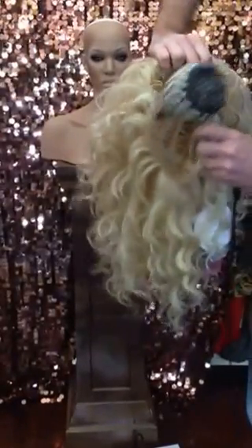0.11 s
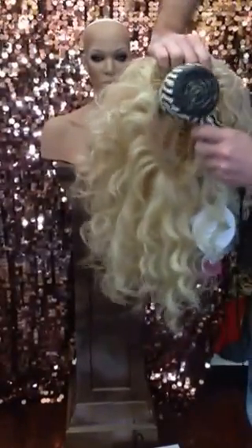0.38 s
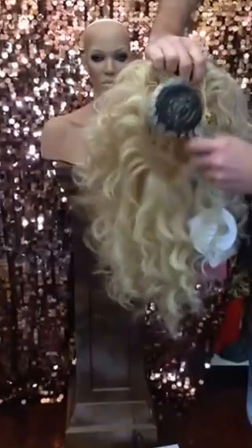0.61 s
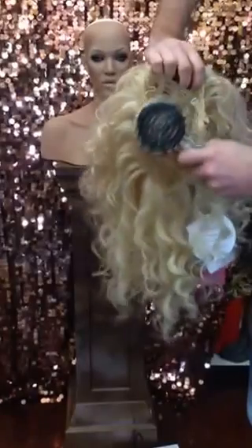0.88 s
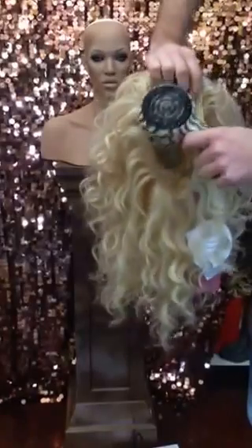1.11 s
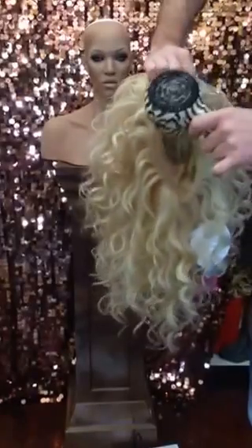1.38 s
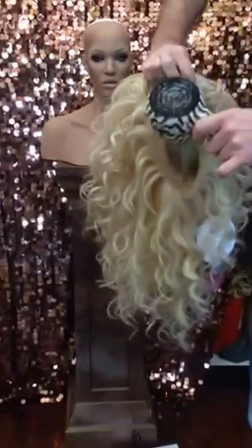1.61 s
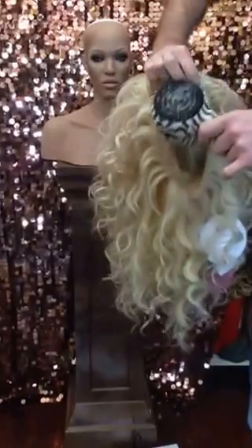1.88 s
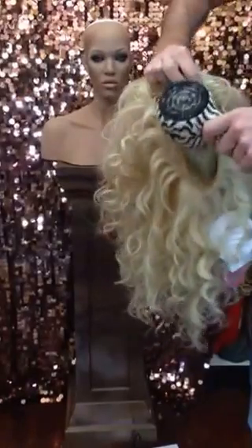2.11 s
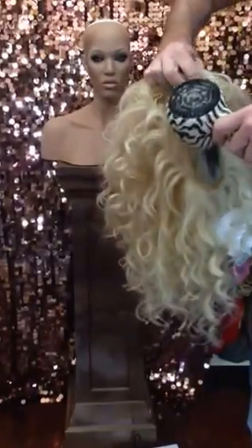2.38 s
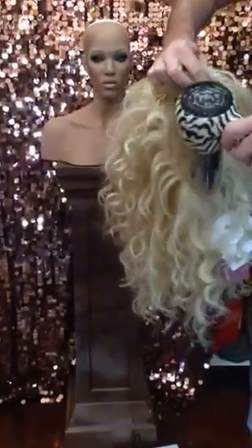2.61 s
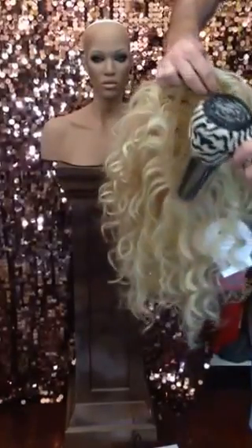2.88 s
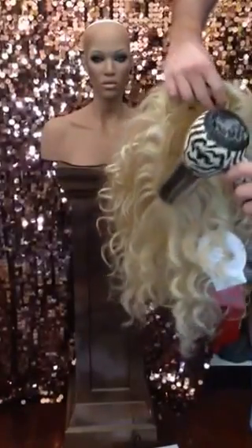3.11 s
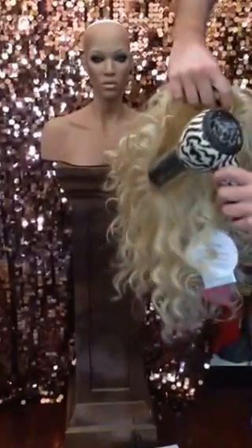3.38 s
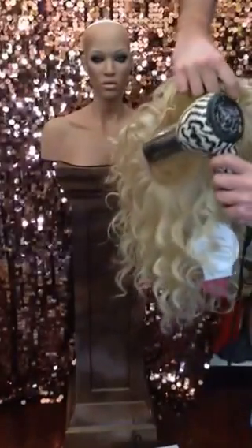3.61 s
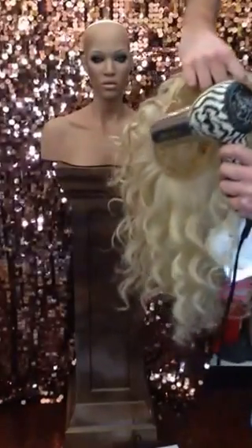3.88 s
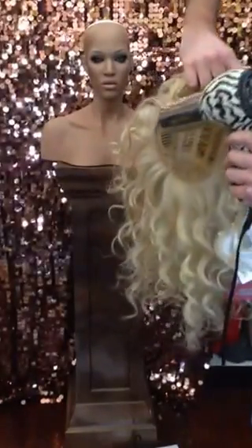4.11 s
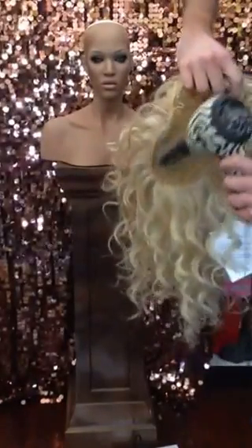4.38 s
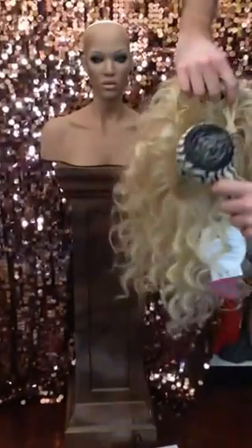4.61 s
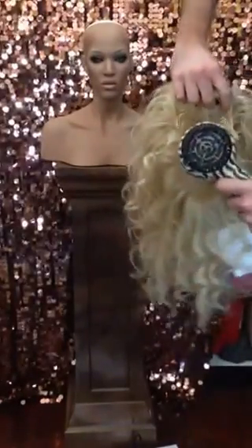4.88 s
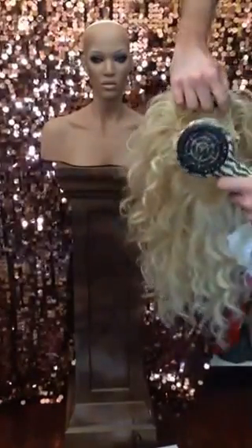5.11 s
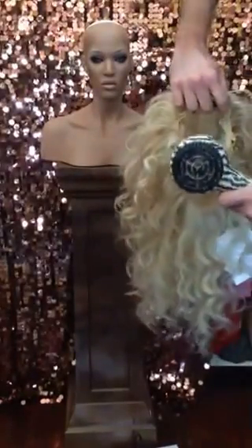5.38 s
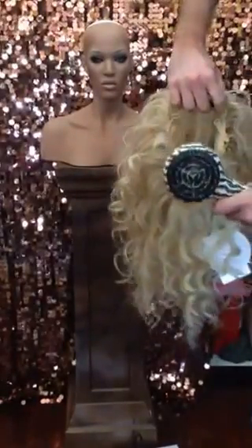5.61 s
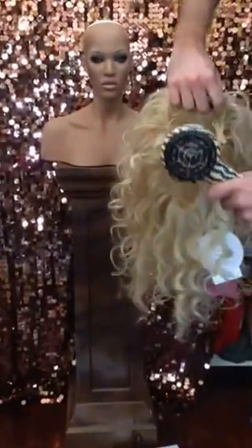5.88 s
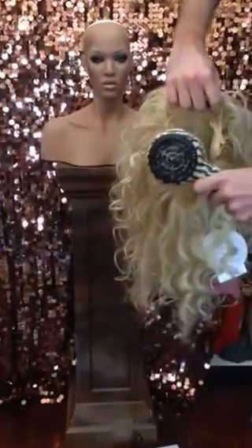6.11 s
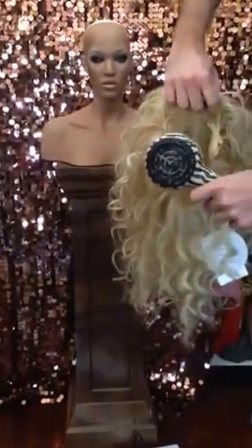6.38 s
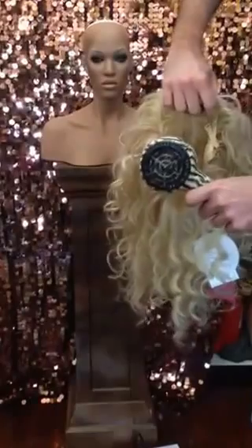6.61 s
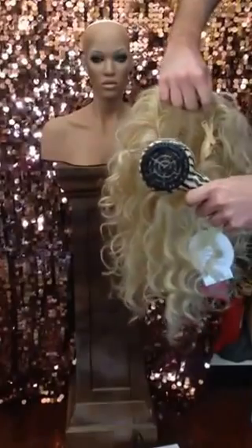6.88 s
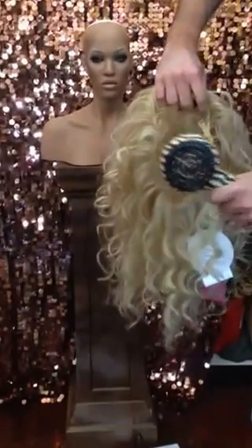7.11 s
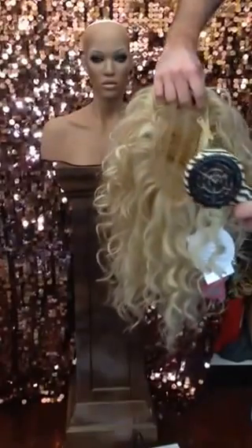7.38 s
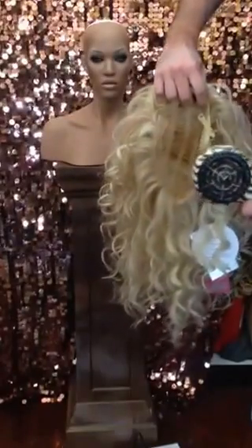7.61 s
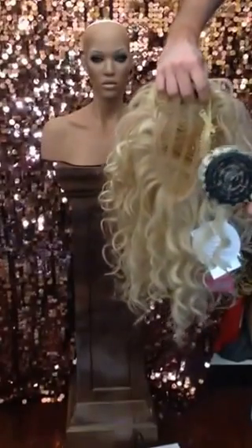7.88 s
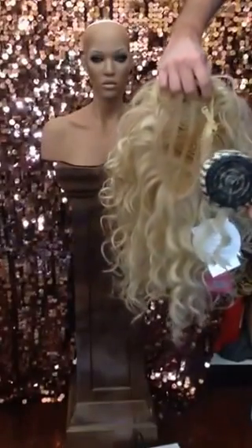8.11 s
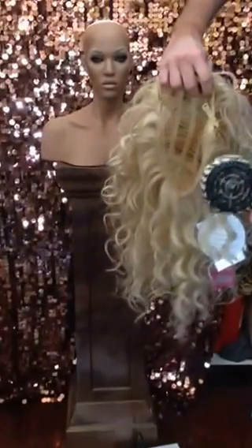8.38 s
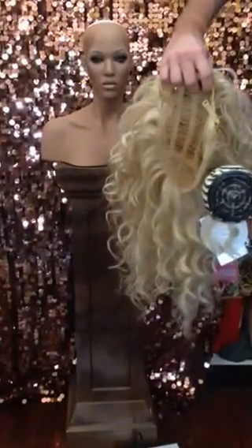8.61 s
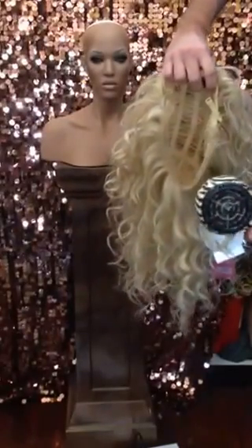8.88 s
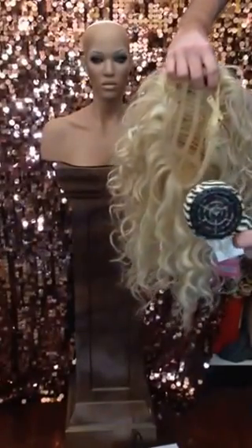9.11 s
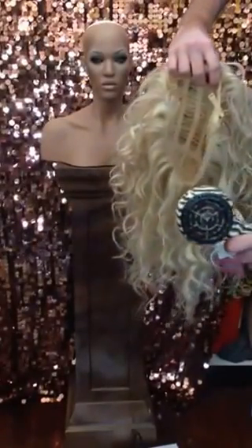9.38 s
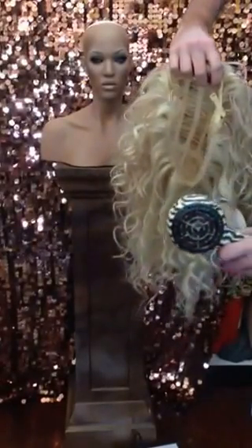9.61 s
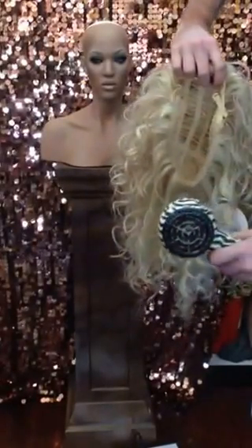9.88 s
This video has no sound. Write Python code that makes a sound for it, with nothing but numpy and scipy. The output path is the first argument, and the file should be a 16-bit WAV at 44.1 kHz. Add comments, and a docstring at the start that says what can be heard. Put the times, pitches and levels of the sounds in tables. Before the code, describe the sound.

A hand-held hair dryer roars steadily on high with a piercing whine, wavering as it moves, then drops abruptly to a softer, lower setting and keeps running.

```python
"""A small room: a hand-held hair dryer on its high setting is turned this way and that, then
switched to low. Turbulent air makes a broad rush, random spectra coloured by turn and setting, with
the peaks and dips of room and casing. A fan on a motor shaft whines at multiples of its speed.
Both channels are alike but for brief bursts of hiss in treble bands."""
import sys
import numpy as np
from scipy import signal
from scipy.io import wavfile
from scipy.ndimage import uniform_filter1d

SR = 44100
rng = np.random.default_rng(int(sys.argv[2]) if len(sys.argv) > 2 else 0)


def attenuation_scalar(level_db):
    """Turn a level in dB into a linear amplitude multiplier (20 dB per decade)."""
    decades = np.asarray(level_db, float) / 20
    return 10 ** decades


def inscribe(sig):
    """Save sig as 16-bit PCM at rate SR to the path in sys.argv[1].

    A 1-D sig is mono; a 2-D sig holds one channel per row.
    Samples are clipped to [-1, 1] before scaling.
    """
    pcm = np.round(np.clip(np.atleast_2d(sig).T, -1, 1) * 32767)
    wavfile.write(sys.argv[1], SR, pcm.astype(np.int16))


N = 440559
SWITCH_S = 6.728  # high to low setting
# the hand: (time [s], turn [0 = intake facing, 1 = side-on], nearness [dB])
HAND = [(0, .5, -0.61), (.6, .3, -0.26), (1.1, 0.22, 0.13), (1.3, 0.97, 0.17), (2.6, 0.98, 0.45),
        (3, 0.54, -0.15), (4.4, 0.6, 0.038), (4.7, 0.33, 0.0058), (5.4, 0, 0.34), (6.2, 0, 0.23),
        (6.7, 0, -0.13), (6.85, .05, 0.65), (7.2, 0, -0.22), (7.8, 0.3, 0.14), (8.8, 0.22, -.5),
        (9.99, 0.1, 0.096)]


def rush():
    """Turbulent air: random short-time spectra whose colour follows the turn and speed of the fan."""
    # colour of the rush, intake facing: (frequency [Hz], density [dB per Hz, relative])
    facing_points = [(25, -37), (110, -19.5), (250, -13), (500, -9.5), (800, -4), (1400, -5.5), (2600, 0),
                     (4600, 1), (6400, -7), (8400, -5.5), (10800, -8), (12200, -14.5), (13600, -10.5),
                     (15300, -19)]
    # the same, side-on: (frequency [Hz], density [dB per Hz, relative])
    side_points = [(25, -40), (110, -20.5), (250, -14), (500, -10), (800, -4.5), (1400, -2.5), (2600, -1),
                   (4600, 0.4), (6400, -6), (8400, -2.5), (10800, -9.5), (12200, -16.5), (13600, -17),
                   (15300, -20)]
    # the same, low setting: (frequency [Hz], density [dB per Hz, relative])
    gentle_points = [(25, -31), (110, -12.5), (250, -10), (500, -5.5), (800, -1), (1400, -3.5), (2600, 0.3),
                     (4600, -3), (6400, -10.5), (8400, -9), (10800, -13), (12200, -15.5), (13600, -14.5),
                     (15300, -21.6)]
    air_db, fan_law = -25, 2.5  # band level at 302 Hz shaft speed; power of the shaft speed
    echo_hz, echo_width_hz = 1280, 320  # dip where an echo off the hair cancels
    side_echo_db, low_echo_db = -5.5, -3.5  # fully side-on; on the low setting

    frame_count, hz = N // 1024 + 5, np.fft.rfftfreq(4096, 1 / SR)
    t = np.arange(frame_count) * 1024 / SR
    turn_side, near_db = curve(HAND, t)
    side_on, low = np.clip(turn_side, 0, 1), slowed(t)
    level_db = air_db + near_db + fan_law * 20 * np.log10(shaft_hz(t) / 302)

    facing = read(facing_points, hz)[:, None]
    side = read(side_points, hz)[:, None]
    gentle = read(gentle_points, hz)[:, None]
    colour_db = (1 - low) * facing + low * gentle + side_on * (side - facing)
    echo_db = side_echo_db * side_on ** 4 + low_echo_db * low
    colour_db += echo_db * bell(hz, echo_hz, echo_width_hz)
    colour_db += room_db(hz, t, low)

    real, imag, ripple, patches = rng.standard_normal((frame_count, len(hz), 4)).T
    # standing waves: slow, narrow in frequency
    ripple = uniform_filter1d(ripple, size=40, axis=1)
    ripple = evened(uniform_filter1d(ripple, size=2, axis=0))
    ripple /= np.sqrt(1 + hz[:, None] / 2500)  # direct sound wins in the treble
    # gusts on hair: quick, wide in frequency
    patches = uniform_filter1d(patches, size=4, axis=1)
    patches = evened(uniform_filter1d(patches, size=80, axis=0))
    gain = attenuation_scalar(colour_db + 2.63 * ripple + .5 * patches)
    band = (hz > 1400) & (hz < 4000)  # level reference
    gain *= attenuation_scalar(level_db) / np.sqrt((gain[band] ** 2).sum(0))
    air = signal.istft(gain * (real + 1j * imag), nperseg=4096, noverlap=3072)[1][:N]
    flutter = evened(uniform_filter1d(rng.standard_normal(N), size=600))  # eddies shake the whole stream
    return air * (1 + 0.04 * flutter)


def room_db(hz, t, low):
    """Room and casing resonances: peaks and dips at fixed pitches that swell as the dryer moves."""
    # (centre [Hz], width [Hz], high setting [dB], low setting [dB])
    resonances = [(202, 40, 2, 1), (274, 17, -0.5, -1), (297, 16, 3, -1.5), (336, 16, -3, -5),
                  (413, 43, 4, 2), (559, 45, -8.5, -7), (610, 77, 4.5, 4), (653, 25, -12, -7),
                  (734, 14, 5.5, 0.5), (773, 16, 5, 7.5), (844.4, 22, 6, 5.5), (960, 20, 1.5, 4),
                  (1100, 39, 2, 1), (1250, 190, -2.5, 0.5), (1657, 130, 3.5, 1.5), (1849, 28, 6, 4),
                  (2040, 83, 1.5, 3), (2550, 166, 4, 1), (2900, 260, -1, -3.5), (3580, 270, 0.5, 2),
                  (5290, 1000, 0.5, 3), (7360, 480, 0.5, -2)]
    total_db = 0
    for (f, width_hz, high_db, low_db), waver in zip(resonances, drift(t, 1.47, count=len(resonances))):
        peak_db = (1 - low) * high_db + low * low_db
        total_db = total_db + peak_db * (1 + 0.22 * waver) * bell(hz, f, width_hz)
    return total_db


def whine():
    """Clean tones on multiples of the shaft speed; reflections make each one waver as the hand moves."""
    # shaft tones: (multiple of shaft speed, intake facing [dB], side-on [dB], low setting [dB])
    tones = [(1, -65, -59, -83), (2, -59, -58, -71.5), (3, -48, -71, -57.5), (5, -44, -43, -54),
             (6, -48, -45, -61.5), (7, -47, -45, -56), (16, -46, -55, -55.5), (17, -43, -55, -63),
             (24, -56, -46, -70), (28, -46, -44, -68), (35, -51, -42.5, -79)]
    # blade whine swelling as the hand moves: (time [s], length [s], level [dB])
    swells = [(.15, 0.14, 2), (0.372, 0.11, 4.5), (1.08, .2, 1.5), (1.32, .12, -0.5), (2.17, 0.18, 5),
              (2.6, 0.23, 2.5), (3.0, .3, -2), (3.33, 0.25, 3.5), (3.98, .3, -1), (4.3, 0.16, 4),
              (4.52, .12, 3.5), (4.77, .2, -2), (5.04, 0.17, 4), (5.323, .2, 4.5), (5.62, 0.11, 0),
              (6.03, 0.21, 5), (6.74, .08, 3)]
    blades, blade_db, low_blade_db = 14, -33.7, -52
    wobble_rms_hz = .1  # the hand shakes the pitch

    t, coarse = np.arange(N) / SR, np.arange(0, N / SR + 1, 1 / 100)
    wobble_hz = wobble_rms_hz * np.interp(t, coarse, drift(coarse, 10, count=1)[0])
    turns = np.cumsum(shaft_hz(t) + wobble_hz) / SR
    low = slowed(t)
    side_on = np.clip(curve(HAND, t)[0], 0, 1)
    wavers = drift(coarse, 12, count=len(tones) + 1)

    swell_db = sum(db * bell(coarse, s, length_s)[:, 0] for s, length_s, db in swells)
    blade_level_db = blade_db + low ** 1.45 * (low_blade_db - blade_db)
    blade_level_db += np.interp(t, coarse, swell_db + .9 * wavers[-1])
    out = attenuation_scalar(blade_level_db) * np.cos(2 * np.pi * blades * turns)

    for (multiple, facing_db, side_db, low_db), waver in zip(tones, wavers):
        db = (1 - low) * ((1 - side_on) * facing_db + side_on * side_db) + low * low_db
        db = db + 2.1 * np.interp(t, coarse, waver)
        out += attenuation_scalar(db) * np.cos(2 * np.pi * (round(multiple) * turns + rng.random()))
    return np.sqrt(2) * out  # levels are rms


def shaft_hz(t):
    """Shaft speed, running down from the high setting to the low one."""
    # high setting, racing a little whenever the hair chokes the stream: (time [s], shaft speed [Hz])
    high_points = [(0, 305.3), (.22, 304.7), (.34, 307.5), (.52, 305.5), (.63, 305.9), (.9, 304.8),
                   (1.05, 302.6), (1.37, 301.0), (1.72, 302.9), (1.82, 302.4), (1.96, 303.0), (2.4, 301.3),
                   (2.9, 301.4), (3.07, 300.7), (3.5, 301.7), (3.82, 300.9), (4.32, 303.2), (4.64, 300.3),
                   (5.35, 300.0), (5.65, 299.6), (5.88, 300.0), (6.22, 302.2), (6.45, 302.3), (6.72, 301.8)]
    low_hz, sag_hz_per_s = 204.6, .6
    low = slowed(t)
    return (1 - low) * curve(high_points, t)[0] + low * (low_hz - sag_hz_per_s * (t - SWITCH_S))


def slowed(t):
    """0 on the high setting, rising to 1 as the fan runs down to the low one."""
    slowing_s, drag = .137, .8  # drag bites hardest at speed
    return 1 - np.exp(-(np.maximum(t - SWITCH_S, 0) / slowing_s) ** drag)


def drift(t, top_hz, count):
    """Slow random wavers of joint rms 1, one a row."""
    hz = np.geomspace(top_hz / 20, top_hz, num=24)
    phase = rng.random((count, 24, 1))
    waves = np.sin(2 * np.pi * (hz[:, None] * t + phase)) / np.sqrt(hz[:, None])
    return evened(waves.sum(1))


def bell(x, centre, width):
    """A Gaussian bump of height 1, two standard deviations to the width, as a column."""
    return np.exp(-.5 * ((x[:, None] - centre) / (width / 2)) ** 2)


def evened(x):
    """Scales to rms 1."""
    return x / np.sqrt(np.mean(x ** 2) + 1e-20)


def read(points, hz):
    """Reads a spectrum on a log-frequency axis."""
    f, value = np.transpose(points)
    return np.interp(np.log(hz + 1), np.log(f + 1), value)


def curve(rows, t):
    """All columns of a table at the times t."""
    s, *columns = np.transpose(rows)
    return [np.interp(t, s, c) for c in columns]


def widened(x):
    """Now and then a treble band spreads, for an instant, into hiss that differs left and right."""
    # edges of the treble bands: (frequency [Hz])
    band_edges_hz = [4100, 5200, 6400, 7500, 8900, 10300, 11700, 13800]
    share, hiss_db = .022, -1  # chance per band and frame; hiss relative to the band
    framing = dict(nperseg=2048, noverlap=1024, window="cosine")
    hz, t, z = signal.stft(x, SR, **framing)
    wide = rng.random((len(band_edges_hz) + 1, len(t))) < share
    wide[[0, -1]] = False  # nothing outside the bands
    hiss_level = attenuation_scalar(hiss_db) * np.sqrt(uniform_filter1d(abs(z[0]) ** 2, size=32, axis=0) / 2)
    shape = hiss_level.shape
    hiss = hiss_level * (rng.standard_normal(shape) + 1j * rng.standard_normal(shape))
    side = signal.istft(wide[np.digitize(hz, band_edges_hz)] * hiss, SR, **framing)[1]
    return x + np.array([[1], [-1]]) * side[:N]


def scene():
    """The dryer, alike in both channels."""
    return np.tile(rush() + whine(), (2, 1))


def roll_off(x):
    """The treble ends steeply here."""
    return signal.sosfilt(signal.butter(12, 16560, fs=SR, output="sos"), x)


def record(dry):
    """Brief treble spreading, then a steep band limit."""
    edge_hz = 15310
    lowpass = signal.firwin(2047, edge_hz, window=("kaiser", 11), fs=SR)
    mix = signal.oaconvolve(widened(dry), lowpass[None], "same")
    return roll_off(mix)


dry = scene()
out = record(dry)
inscribe(out)
```